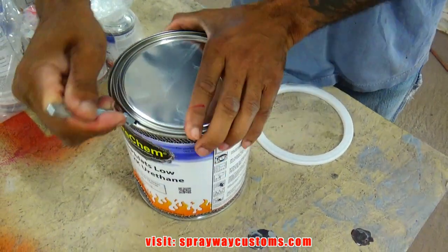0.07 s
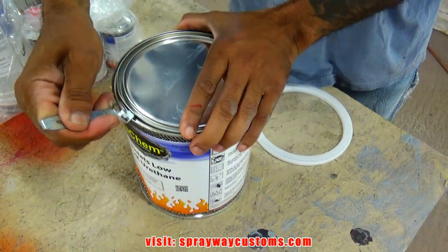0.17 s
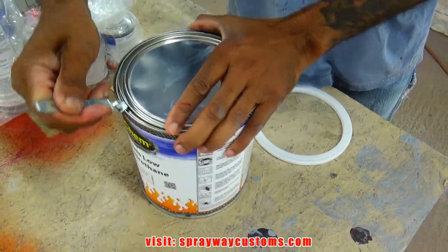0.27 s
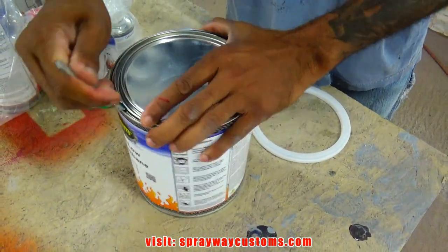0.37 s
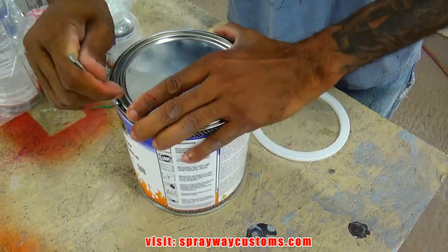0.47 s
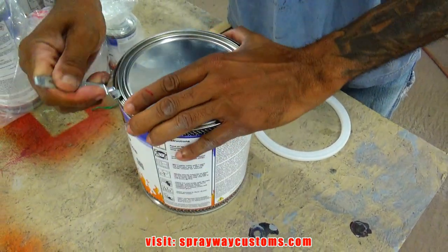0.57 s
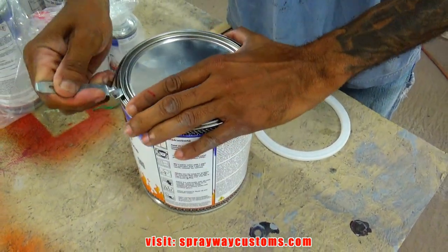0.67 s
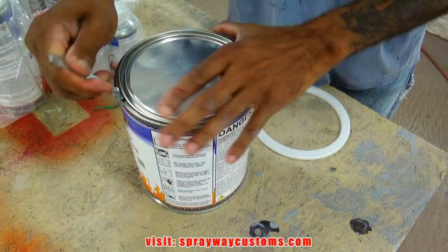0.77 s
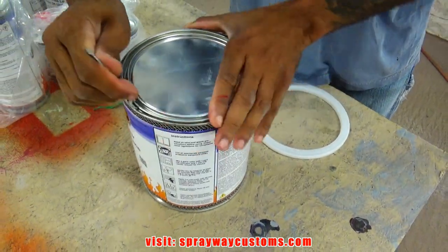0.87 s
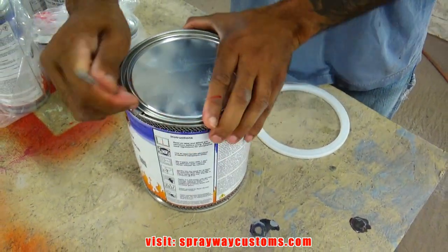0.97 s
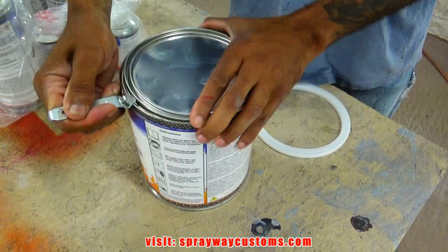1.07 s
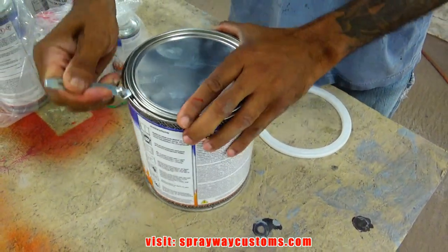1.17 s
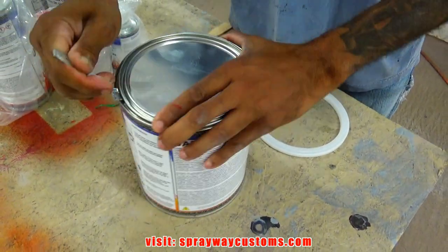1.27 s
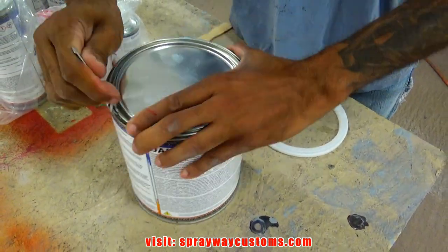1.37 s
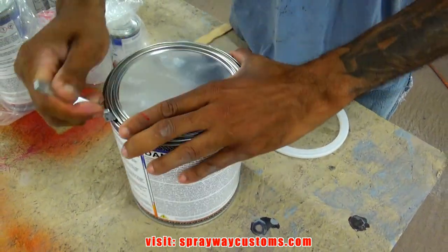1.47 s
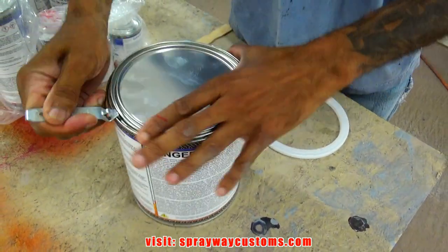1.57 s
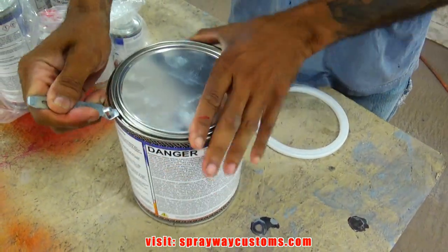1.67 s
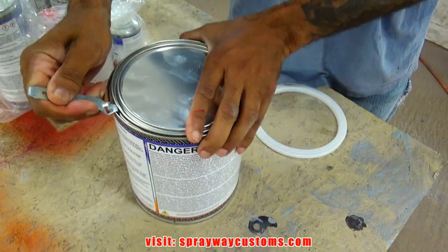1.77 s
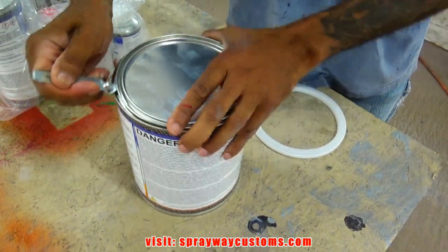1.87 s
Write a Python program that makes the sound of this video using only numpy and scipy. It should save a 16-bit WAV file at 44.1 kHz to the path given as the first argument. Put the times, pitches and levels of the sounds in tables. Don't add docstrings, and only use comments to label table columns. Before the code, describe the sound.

Close, dry-sounding prying of a tin paint can lid: the seal bursts with a loud tinny clang, a hard crack follows, then gritty dragging on a board, a second springy snap, a brief metallic skid and low knocks.

```python
import sys
import numpy as np
from scipy import signal
from scipy.fft import rfft, irfft, next_fast_len
from scipy.io import wavfile
from scipy.ndimage import map_coordinates

SR = 44100
rng = np.random.default_rng(int(sys.argv[2]) if len(sys.argv) > 2 else 0)


def volts_from_decibels(level):
    exponent = np.asarray(level, float) / 20
    return 10 ** exponent


def log_audio(samples):
    frames = np.atleast_2d(samples).T
    limited = np.clip(frames, -1, 1)
    pcm = np.round(limited * 32767).astype(np.int16)
    wavfile.write(sys.argv[1], SR, pcm)


N = 83790


def unit(x):
    return x / np.sqrt(np.mean(x ** 2) + 1e-20)


def along(points, hz):
    f, v = np.transpose(points)
    return np.interp(np.log(hz + 1), np.log(f + 1), v)


def filtered(x, response):
    m = next_fast_len(x.shape[-1] + 8192)
    return irfft(rfft(x, m) * response(np.fft.rfftfreq(m, 1 / SR)), m)[..., :x.shape[-1]]


def resonant(x, peaks):
    def response(f):
        total = 0
        for k, (centre, width, db) in enumerate(peaks):
            damping = 1j * f * width
            total = total + (-1) ** k * volts_from_decibels(db) * damping / (centre * centre - f * f + damping)
        return total
    return unit(filtered(x, response))


def wobble(rate, n, count=1):
    knots = rng.standard_normal((count, int(n * 300 / SR) + 4))
    return np.array([map_coordinates(k, [np.arange(n) * rate / SR]) for k in knots])


def stroke(start, strongest, end, power=1.27):
    t = np.arange(N) / SR
    rise = (t - start) / abs(strongest - start)
    fall = (end - t) / abs(end - strongest)
    return np.sin(np.pi / 2 * np.clip(np.minimum(rise, fall), 0, 1)) ** power


def grit(flutter_db):
    grains_per_s, smooth_share = 4000, 0.9
    hit = rng.random(N) < grains_per_s / SR
    size_db = 3.5 * np.minimum(rng.exponential(size=N), 3)
    grains = hit * volts_from_decibels(size_db) * rng.standard_normal(N)
    rub = smooth_share * rng.standard_normal(N)
    return (unit(grains) + rub) * volts_from_decibels(flutter_db * wobble(90, N)[0])


def add(out, s, sound):
    out[round(s * SR):][:len(sound)] += sound


def air():
    # (frequency [Hz], level [dB per Hz])
    air_spectrum = [(15, -34), (25, -14), (145, 4), (285, -4.5), (936, -5.5), (1610, -11.5), (5280, -17.5),
                    (8140, -13), (16000, -25)]
    a, b = filtered(rng.standard_normal((2, N)), lambda hz: volts_from_decibels(along(air_spectrum, hz)))
    return volts_from_decibels(-51.5) * unit(np.array([a + 0.099 * b, a - 0.19 * b]))


def singing(peaks, sway_db):
    total = 0
    for centre, width, db in peaks:
        level = volts_from_decibels(db + sway_db * wobble(35.14, N)[0])
        total = total + level * width ** 0.5 * resonant(grit(flutter_db=2), [(centre, width, db)])
    return unit(total)


def drags():
    # (start [s], strongest [s], end [s], hiss level [dB], body level over the hiss [dB])
    drag_strokes = [(-.03, 0.024, 0.079, -37.5, 1), (0.22, 0.296, 0.48, -54, -2),
                    (0.342, 0.375, 0.57, -49, -13), (0.434, 0.502, 0.58, -30.5, -2.5),
                    (0.602, 0.671, 1.1, -65, -4), (0.834, 0.856, 0.869, -47.5, -6),
                    (0.897, 0.915, .97, -35.5, -6), (0.926, .965, 1.008, -37.5, -1),
                    (0.97, 1.026, 1.085, -44, 0), (1.2, 1.21, 1.8, -47.5, -0.5),
                    (1.344, 1.425, 1.481, -34.5, 0), (1.43, 1.475, 1.532, -37.5, 0),
                    (1.521, 1.563, 1.547, -47.5, 14.5), (1.584, 1.575, 1.603, -47, 14),
                    (1.722, 1.745, 1.8, -42, -3), (1.845, 1.901, 1.91, -39, -1)]
    # (frequency [Hz], width [Hz], level [dB])
    rim_modes = [(3130, 860, -5.5), (4700, 630, -5), (5740, 420, -9), (6900, 580, -7.5), (8000, 1100, -3),
                 (9160, 1350, -3), (11100, 1600, -6), (12500, 2200, -31)]
    # (frequency [Hz], width [Hz], level [dB])
    body_modes = [(180, 33, -0.5), (296, 37, -6), (518, 83, 1), (716, 144, -1.5), (1340, 400, -5),
                  (1325, 105, -5), (1790, 130, -2.5), (2130, 580, -6.5)]
    hiss, hum = np.zeros(N), np.zeros(N)
    for start, strongest, end, hiss_db, body_db in drag_strokes:
        pressure = stroke(start, strongest, end)
        hiss += volts_from_decibels(hiss_db) * pressure
        hum += volts_from_decibels(hiss_db + body_db) * pressure
    rim = filtered(singing(rim_modes, sway_db=3.5), lambda f: 1 / (1 + (f / 13000) ** 4))
    return hiss * rim + hum * singing(body_modes, sway_db=1)


def room(x, count=24):
    # (frequency [Hz], t60 [s])
    room_decay = [(200, 0.28), (1000, 0.28), (4000, 0.42), (12000, 0.091)]
    hz, t, z = signal.stft(rng.standard_normal((count, 2, SR // 2)), SR, nperseg=256)
    tails = signal.istft(z * volts_from_decibels(-60 * t / along(room_decay, hz)[:, None]), SR, nperseg=256)[1]
    place, out = np.arange(N) / N * (count - 1), 0
    for k, (a, b) in enumerate(tails):
        part = x * np.sqrt(np.clip(1 - np.abs(place - k), 0, 1))
        late = np.pad(part, (300, 0))[None]
        ports = np.array([a + 0.48 * b, a - 0.19 * b]) / np.linalg.norm(a)
        out = out + signal.fftconvolve(late, ports, axes=1)[:, :N]
    return out


def pop(modes, tilt_db, share, t):
    hz, mode_db, t60 = np.array(modes).T[..., None]
    scatter_db = 1.06 * rng.standard_normal(hz.shape)
    noise = rng.standard_normal(len(t))
    sway = wobble(100, len(t), count=len(hz)) + 1j * wobble(100, len(t), count=len(hz))
    shake = 1 + np.minimum(t / 0.026, 1) * np.minimum(hz / 1300, 1) ** 2 * sway
    decay = volts_from_decibels(mode_db + scatter_db + tilt_db * np.log2(hz / 700) - 60 * t / (t60 * share))
    ring = decay * (shake * np.exp(2j * np.pi * hz * t)).imag
    colour = lambda f: (f / 900) ** 2 / (1 + (f / 900) ** 2.35) / (1 + (f / 2600) ** 4)
    clang_t60 = 0.099 * share
    clang = unit(filtered(noise, colour)) * volts_from_decibels(-10.5 + 1.7 * tilt_db - 60 * t / clang_t60)
    return (ring.sum(0) + clang) * (1 - np.exp(-t / 0.0016))


def lid():
    # (time [s], peak level [dB], brightness [dB per octave], share of the ring time [1])
    lid_pops = [(.022, -36.5, 10.5, 0.61), (.194, -24.5, 7, 0.63), (0.221, -10.5, -4.5, 0.82),
                (.446, -30, 8.5, 1), (.534, -23.5, 2, 1), (.632, -35, 5, 0.79), (0.662, -24.5, 6, 0.61),
                (.688, -15, -13, 0.75), (.903, -28.5, 4, 0.58), (.953, -29.5, 4.5, 0.94),
                (1.074, -36, 1, 1), (1.126, -22.5, 5, 0.55), (1.585, -28, -0.5, 0.23)]
    seal_burst = (.346, 0.83, -1.1, 1.1)
    held_snap = (1.147, -1.57, 0.62, 1.01)
    # (frequency [Hz], level [dB], t60 [s])
    sealed_modes = [(546, -9, .13), (650, -19, 0.058), (695, 2.5, 0.11), (780, -21, 0.21),
                    (873, -17.5, 0.25), (1085, -14.5, 0.094), (1136, -22, 0.18), (1367, -18, 0.11),
                    (1487, -16.5, 0.12), (1750, -9, 0.068), (2146, -19.5, 0.07), (2405, -15.5, 0.045),
                    (3090, -19.5, 0.024)]
    # (frequency [Hz], level [dB], t60 [s])
    freed_modes = [(545.6, -11, 0.14), (662.3, -7, 0.2), (691.7, -5.5, 0.17), (877, -16, 0.23),
                   (1084, -16.5, .16), (1153, -18.5, 0.16), (1247, -26, 0.18), (1378, -12, 0.082),
                   (1448, -14.5, .14), (1580, -24, 0.12), (1702, -16.5, 0.079), (1850, -19.5, 0.15),
                   (2075, -19.5, 0.14), (2410, -19, 0.1)]
    # (frequency [Hz], level [dB], t60 [s])
    held_modes = [(532, -5, 0.068), (611, -3, 0.059), (671, 2, 0.076), (871, -8, 0.091),
                  (930, -11.5, 0.079), (1086, -20, 0.12), (1418, -18, 0.13), (1741, -12.5, 0.075),
                  (1956, -11, 0.05), (2405, -12, 0.03), (3060, -17, 0.035), (4100, -11, 0.017)]
    out, t = np.zeros(N + SR), np.arange(SR * 3 // 10) / SR
    for modes, rows in ((sealed_modes, lid_pops), (held_modes, [held_snap]), (freed_modes, [seal_burst])):
        for s, db, tilt_db, share in rows:
            add(out, s, volts_from_decibels(db - 1.5) * pop(modes, tilt_db, share, t))
    return out[:N]


def ticks():
    # (time [s], peak level [dB], brightness [dB per octave])
    tip_ticks = [(0.024, -20, -2.5), (0.0354, -23, 20), (0.179, -23.5, -8), (0.1945, -23, 1),
                 (0.2227, -30, -4.5), (.2773, -42, 10), (.291, -44, 6), (0.301, -43, 1), (0.319, -36, 6),
                 (.3415, -29, -10), (0.3456, -18, -6), (0.4476, -15.5, -4), (0.4555, -3, 1.5),
                 (.459, -24, -4), (0.6313, -34.5, -5), (0.662, -23.5, 6), (0.7318, -37, -5),
                 (0.838, -35, 0), (.8056, -53, -3), (0.8727, -35, -2), (0.902, -20.5, -1), (.936, -28, -1),
                 (0.977, -25, 4), (1.02, -32, 3), (1.0443, -29, 2), (1.077, -43, 3), (1.1065, -37, -11),
                 (1.1257, -26, 2), (1.1464, -12, 6), (1.417, -19, -3), (1.427, -19.5, -2),
                 (1.467, -22, -2.5), (1.505, -28, -1), (1.5855, -19, -18), (1.5911, -23, -5.5),
                 (1.6074, -21.5, -11), (1.722, -30, 2), (1.7353, -24, 0), (1.8254, -30.5, -4),
                 (1.8797, -28, 4)]
    out, t = np.zeros(N + SR), np.arange(SR // 20) / SR
    for s, db, tilt_db in tip_ticks:
        def colour(f):
            tilt = volts_from_decibels(tilt_db * np.log2((f + 500) / 6000))
            band = f ** 2 / (f ** 2 + 1200 ** 2) / (1 + (f / 12000) ** 5)
            return tilt * band * (1 + 1.37 / (1 + ((f - 8800) / 1300) ** 2))
        crack = unit(filtered(rng.standard_normal(len(t)), colour))
        decay = volts_from_decibels(db + 2 - 60 * t / 0.012)
        add(out, s, decay * crack * (1 - np.exp(-t / 0.0011)))
    return out[:N]


def knocks():
    # (time [s], peak level [dB], pitch [Hz], t60 [s])
    board_knocks = [(.041, -24, 356, 0.022), (.049, -44, 176, 0.15), (0.461, -30, 292.4, 0.11),
                    (0.961, -38.5, 300, 0.086), (1.372, -34.5, 180, 0.28), (1.42, -25.5, 175, 0.089),
                    (1.506, -43.5, 207, 0.29), (1.61, -33, 511, 0.079), (1.632, -19, 509, 0.046),
                    (1.65, -32, 599, 0.061), (1.8243, -16, 980, .018), (1.831, -22.5, 182, 0.037),
                    (1.211, -33, 174, 0.1), (1.345, -38, 426, 0.15), (1.826, -23, 563, 0.07)]
    out, t = np.zeros(N + SR), np.arange(SR // 4) / SR
    for s, db, hz, t60 in board_knocks:
        modes = np.sin(2 * np.pi * hz * t)
        modes += 0.56 * np.sin(2 * np.pi * 1.27 * hz * t)
        modes += 0.31 * np.sin(2 * np.pi * 0.613 * hz * t)
        add(out, s, volts_from_decibels(db - 60 * t / t60) * modes * (1 - np.exp(-t * hz / 0.54)))
    return out[:N]


def squeals():
    # (middle [s], half length [s], frequency [Hz], level [dB])
    rim_squeals = [
        (.52, .016, 5670, -37),
        (1.422, .025, 8150, -36),
        (.94, .04, 8900, -43),
        (.97, .02, 1450, -40),
        (.666, .01, 1780, -32),
        (1.425, .03, 4700, -42),
        (1.765, .016, 1320, -47),
    ]
    out = np.zeros(N)
    for s, half, hz, db in rim_squeals:
        narrow = resonant(grit(flutter_db=-1.2), [(hz, hz / 25, 0)])
        out += volts_from_decibels(db) * stroke(s - half, s, s + half) * resonant(narrow, [(hz, hz / 8, 0)])
    return out


def skid():
    # (start [s], strongest [s], end [s])
    slip_times = (1.185, 1.207, 1.221)
    # (frequency [Hz], width [Hz], level [dB])
    blade_modes = [(5000, 940, -8.5), (5930, 440, -3.5), (6640, 280, -1), (7980, 570, -2.5),
                   (9200, 800, -7), (10600, 1400, -9.5), (13000, 3500, -22), (2540, 2200, -16)]
    return volts_from_decibels(-17) * stroke(*slip_times, power=0.8) * resonant(grit(flutter_db=2.5), blade_modes)


def scene():
    # (frequency [Hz], phase [rad])
    port_phase = [(0, -0.35), (860, 0.65), (4650, 0.25), (6980, 0.34), (16200, -0.17)]
    # (frequency [Hz], level [dB])
    port_level = [(60, 0.0), (180, 0.0), (550, 0.0), (1650, 0), (4970, 0.8), (9000, 1.46), (15000, 0.1)]
    sources = drags() + lid() + ticks() + knocks() + squeals() + skid()
    can = filtered(sources, lambda f: (1j * f / (60 + 1j * f)) ** 2)
    side = np.array([[0.5], [-0.5]])
    phase_hz, phase_rad = np.transpose(port_phase)

    def ports(f):
        phase = np.interp(np.log(f + 100), np.log(phase_hz + 100), phase_rad)
        return volts_from_decibels(along(port_level, f) * side) * np.exp(1j * phase * side)
    return filtered(can + volts_from_decibels(-15) * room(can) + air(), ports)


def top_cut(x):
    return signal.sosfilt(signal.butter(12, 16650, fs=SR, output="sos"), x)


def record(dry):
    # (start [s], shut [s], opening [s], open [s])
    duck_times = (.3315, .3335, .338, .342)
    ducked = dry * volts_from_decibels(np.interp(np.arange(N) / SR, duck_times, [0, -21.5, -21.5, 0]))
    clipped = ducked / (1 + np.abs(ducked / 1.05) ** 6) ** (1 / 6)
    mix = filtered(clipped, lambda f: 1 / (1 + (f / 15300) ** 40))
    return top_cut(mix)


dry = scene()
out = record(dry)
log_audio(out)
```